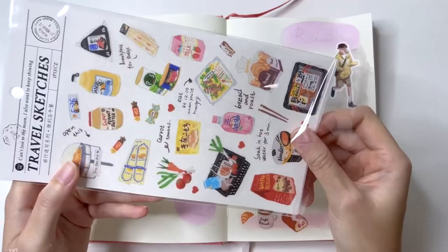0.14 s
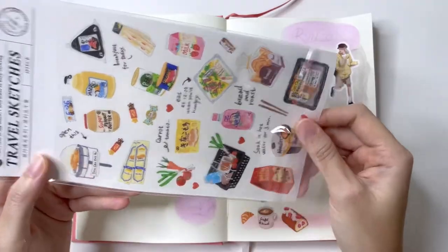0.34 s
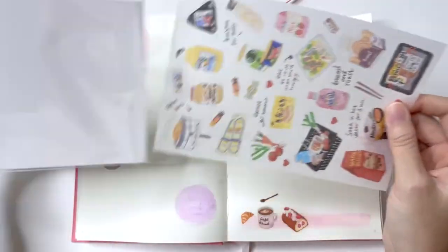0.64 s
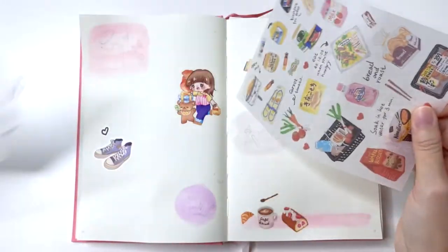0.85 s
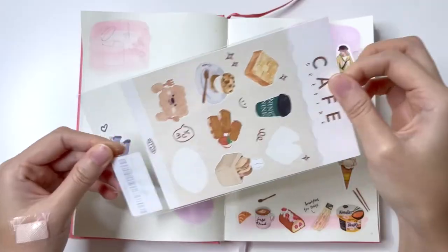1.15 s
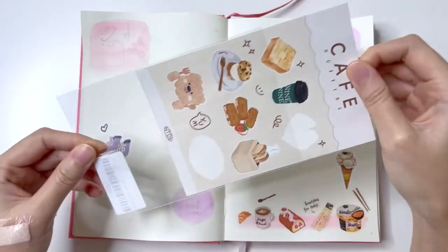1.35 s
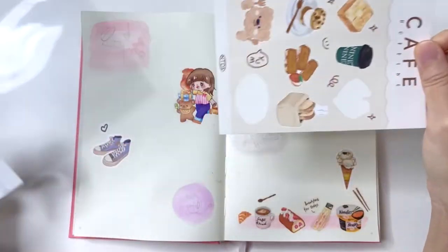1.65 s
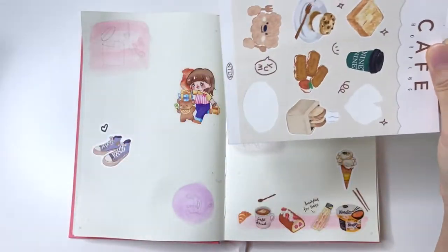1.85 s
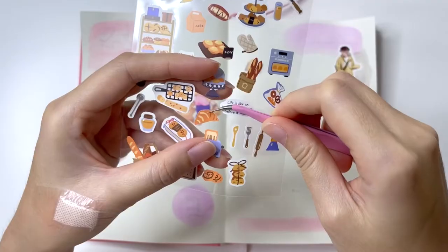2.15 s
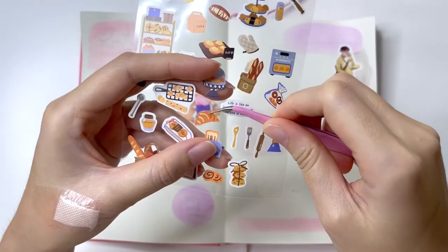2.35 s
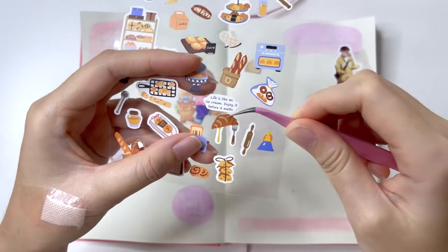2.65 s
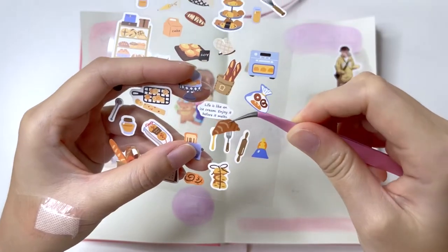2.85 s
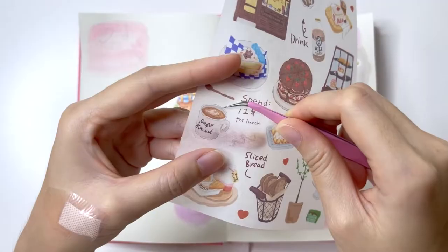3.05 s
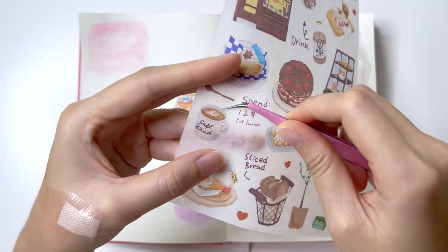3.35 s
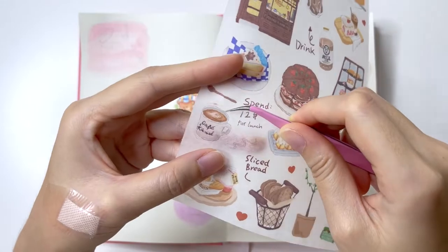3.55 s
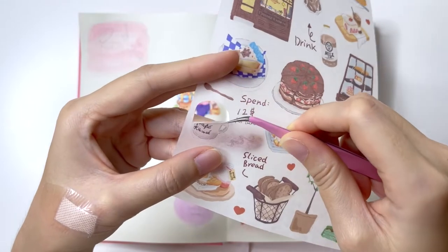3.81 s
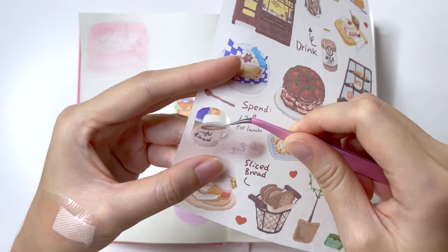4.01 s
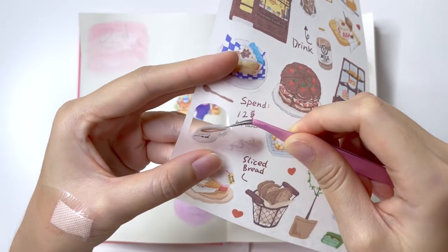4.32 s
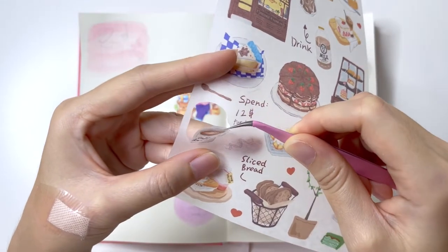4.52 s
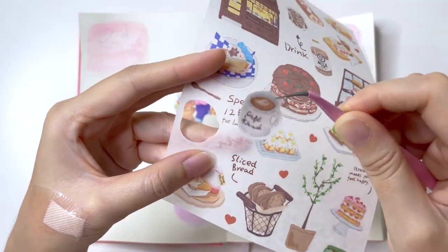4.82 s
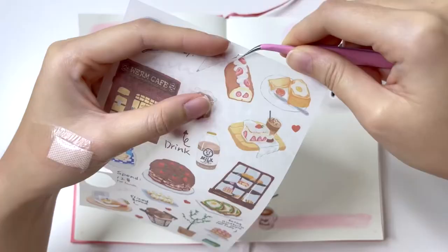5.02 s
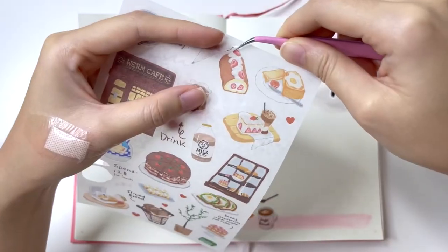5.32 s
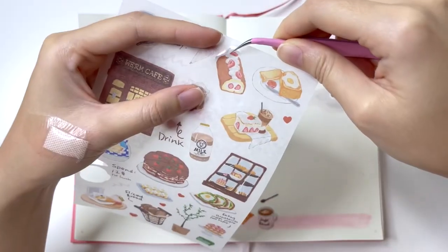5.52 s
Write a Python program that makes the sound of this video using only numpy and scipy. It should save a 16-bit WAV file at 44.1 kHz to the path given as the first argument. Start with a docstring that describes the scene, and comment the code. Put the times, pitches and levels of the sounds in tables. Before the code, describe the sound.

Bright film rustling in quick strokes stops abruptly, followed by quiet sticker peeling, small paper cracks and faint ticks above steady low hum.

```python
"""At a desk in a small room, sticker sheets are slid out of thin plastic sleeves: film hisses and crinkles.
Then tweezers lift stickers off stiff backing paper, which crackles and snaps as it buckles.
Friction is a stream of random slips; buckles are dying bursts of cracks sent through sheet resonances.
Short scrapes, ringing notes and two faint ticks join them; echoes of desk and room follow the handling.
A low mains hum and rumble lie below, a drone joins late; a close stereo pair of microphone ports hears it."""
import sys
import numpy as np
from scipy import signal
from scipy.fft import rfft, irfft, next_fast_len
from scipy.io import wavfile
from scipy.ndimage import map_coordinates

SR = 44100
rng = np.random.default_rng(int(sys.argv[2]) if len(sys.argv) > 2 else 0)


def master(y):
    """Save y as 16-bit WAV."""
    cut = np.clip(np.atleast_2d(y).T, -1, 1)
    pcm = np.round(cut * 32767)  # scale
    wavfile.write(sys.argv[1], SR, pcm.astype(np.int16))


N = 250047
TIME = np.arange(N) / SR

# pushes and drags of a sheet in its sleeve, before the layer gains:
# start_s, length_s, attack_s, release_s, swell_db, hiss_db, body_db
SLIDES = [(0.069, .2, 0.085, 0.09, 4.5, -46, -55), (0.281, 0.12, .018, 0.091, 0, -33.5, -48),
          (0.404, .218, 0.21, 0.15, -0.5, -30, -52.5), (0.766, .125, 0.2, 0.28, 4, -55.5, -58.5),
          (1.027, 0.078, 0.029, 0.088, 12, -44, -60), (1.097, 0.11, 0.076, 0.057, -18, -45, -65.5),
          (1.277, 0.204, 0.035, 0.35, 11.5, -46.5, -66), (1.489, .11, 0.21, 0.078, -0.5, -41, -56),
          (1.709, 0.096, 0.024, 0.45, -11.5, -56.5, -59.5), (1.882, 0.079, 0.032, 0.013, 1, -34, -65)]
# friction colours of the film and of the dragged sheet: frequency_hz, relative_density_db
HISS = [(1500, -34.5), (3000, -20), (4500, -18.5), (6500, -9.5), (8500, -5), (9700, -0.5), (10900, 3),
        (12000, -4), (13200, -20.5), (15800, -24)]
BODY = [(150, -14), (300, 4.5), (600, 0), (1200, 5.5), (1750, -1.5), (2250, 3), (2800, 0), (4000, 1.5),
        (6000, 0.5), (12000, -29)]
# creases of the film flipping over: start_s, level_db, brightness_db_per_octave, t60_s
CRINKLES = [(.0746, -47.5, 3.5, 0.0064), (.1207, -38, 5, 0.011), (.156, -48, 0.5, 0.0067),
            (.246, -54, 0, .007), (.3983, -48, 2, 0.0072), (.6264, -46.5, -1.5, 0.03),
            (.6469, -49, -1.5, 0.018), (.7152, -61, 1, 0.011), (.7656, -53.5, 1.3, 0.022),
            (.7861, -47, -2, 0.01), (.8114, -47.5, 3.5, .04), (.815, -45.5, 2, 0.05),
            (.9424, -59, -1, 0.019), (1.0305, -59, 4.5, .012), (1.0548, -54.5, -3, 0.0077),
            (1.0686, -48.5, -1, 0.0058), (1.0802, -49.5, -2, 0.017), (1.0989, -47, 3.5, 0.017),
            (1.6018, -57, -2.5, 0.016), (1.7084, -49.5, -1.5, 0.021), (1.7148, -46, 2, 0.014),
            (1.8806, -50, 3.5, 0.029)]
# resonances of the bent film: frequency_hz, width_hz, relative_level_db
FILM_MODES = [(588, 790, -6.5), (1278, 280, -1), (2386, 2500, -5.5), (4775, 1300, 1.5), (6270, 1020, 8),
              (8700, 2440, 15.5), (11040, 1200, 24)]
# what all film buckles share: one offset_db for each of the SNAP_BANDS
FILM_SHAPE_DB = (-1, 0, 1, 0)


def sleeves(hiss_db=-4.0, body_db=0.0, crinkle_db=.0, stray_db=-10.0):
    """Sliding friction and buckling: film hisses along the sheet, shakes it, and crinkles."""
    hiss_level = strokes([(*push, hiss) for *push, hiss, body in SLIDES])
    body_level = drag()
    hiss_rub = friction(HISS, per_s=4500, spread_db=3.3, smooth=.85, flutter_db=1.1)
    body_rub = friction(BODY, per_s=600, spread_db=3.5, smooth=.75, flutter_db=1.5)
    hiss = from_db(hiss_level + hiss_db) * hiss_rub
    body = from_db(body_level + body_db) * body_rub
    creases = [*CRINKLES, *strays(body_level + stray_db, per_s=35, spread_db=5, t60=.009)]
    crinkles = buckles(creases, FILM_MODES, FILM_SHAPE_DB, lag_s=0.00044, crackle=2.1, top_hz=12700)
    return hiss + body + from_db(crinkle_db) * crinkles


def drag():
    """Friction as a driving force: how strongly the sliding sheet is shaken, in dB."""
    return strokes([(*push, body) for *push, hiss, body in SLIDES])


# pulls of the tweezers on a sticker, before peel_db:
# start_s, length_s, attack_s, release_s, swell_db, level_db
PULLS = [(2.385, 0.013, 0.12, 0.14, -1, -62), (2.46, 0.038, 0.054, .36, -7, -55),
         (3.412, .01, .01, .25, -1.5, -61.5), (3.572, .14, 0.087, 0.32, -1, -54.5),
         (4.18, 0.082, .1, .2, -2, -71.5), (4.555, 0.06, 0.11, .33, 8, -57),
         (4.98, 0.011, 0.013, 0.088, 0, -59), (5.475, .195, .14, .1, 8, -65.5)]
# colour of the breaking glue: frequency_hz, relative_density_db
GLUE = [(200, 1), (500, 10.5), (1000, 2), (1800, 0), (2400, -3), (3200, -4), (5000, -7), (6600, -6.5),
        (8500, -0.5), (11000, 0.5), (12300, -22.5), (13500, -46.5), (16000, -29)]
# snaps and ticks of the backing paper, before snap_db:
# start_s, level_db, brightness_db_per_octave, t60_s
SNAPS = [(2.3942, -59.5, 0, .02), (2.4325, -49.5, -0.5, 0.023), (2.4368, -47, -1.7, 0.051),
         (2.4497, -33.5, 0.1, 0.015), (3.4065, -46, 0.1, 0.017), (3.5579, -58.5, 7, 0.04),
         (3.7157, -63.5, 3, 0.033), (3.7286, -55, 2.5, 0.018), (3.7492, -55.5, 1.5, 0.0047),
         (3.7843, -65.5, 0.5, .017), (4.1734, -53.5, -1, 0.015), (4.2237, -65, 3, .007),
         (4.5746, -47.5, 0.5, .08), (4.583, -32.5, 0.54, 0.023), (4.6091, -39.5, -1.5, 0.018),
         (4.9767, -52.5, -3, 0.041), (5.4368, -72, 1, 0.011), (5.4553, -71, 1, .007),
         (5.4795, -69, 0.5, .011), (5.5147, -61.5, -0.5, 0.0049)]
# resonances of the bent paper: frequency_hz, width_hz, relative_level_db
PAPER_MODES = [(335.7, 650, -0.5), (595, 920, -10.5), (833, 250, -14.5), (1480, 280, 3), (1840, 590, 3),
               (2504, 290, 2.5), (2670, 220, -2.5), (3190, 390, -2), (3820, 300, -6), (4320, 790, -6.5),
               (6330, 4200, -10.5), (8960, 1200, -5.5), (11030, 560, -1.5)]
# what all paper buckles share: one offset_db for each of the SNAP_BANDS
PAPER_SHAPE_DB = (0, 1.1, 0.23, -0.26)


def stickers(peel_db=-0.5, snap_db=-1.5, threads_per_s=3000, brisk_db=-55, stray_db=-6.5):
    """Adhesive fracture: threads of glue break in a fine crackle; the backing snaps as it bends."""
    level = strokes(PULLS)
    per_s = np.clip(threads_per_s * from_db(1.4 * (level - brisk_db)), 250, 8000)
    # the stronger the pull, the more the single breaks merge into a smooth rasp
    merged = np.clip(per_s / threads_per_s, .6, .8)
    crackle = friction(GLUE, per_s, spread_db=3.2, smooth=merged, flutter_db=1.3, spread_out=.5)
    events = [*SNAPS, *strays(level + stray_db, per_s=50, spread_db=4, t60=.01)]
    snaps = buckles(events, PAPER_MODES, PAPER_SHAPE_DB, lag_s=0.001122, crackle=0.97, top_hz=11800)
    return from_db(level + peel_db) * crackle + from_db(snap_db) * snaps


def friction(spectrum, per_s, spread_db, smooth, flutter_db, spread_out=.45):
    """Stick-slip: tiny uneven slips over a smooth rub, reaching each port a little differently."""
    sizes = from_db(spread_db * np.minimum(rng.exponential(1, N), 4)) * rng.choice([-1, 1], N)
    slips = rms_one(sizes) * (rng.random(N) < per_s / SR) * np.sqrt(SR / per_s)
    shared = slips + smooth * rng.standard_normal(N)
    own_colour = [(300, 6.0), (7000, 2.5), (9000, -11.0), (16000, -7)]
    own = spread_out * coloured(rng.standard_normal((2, N)), own_colour)
    return coloured(shared + own, spectrum) * from_db(flutter_db * drift(110))


# ranges over which the strength of a buckle is set: low_hz, high_hz
SNAP_BANDS = [(250, 1100), (1100, 3500), (3500, 7500), (7500, 14000)]
DULL_OCT_PER_DB = 0.45   # octaves the top corner moves per dB per octave of brightness


def buckles(events, modes, shape_db, lag_s, crackle, top_hz):
    """Dispersion: a kick and a dying burst of micro-cracks spread through a sheet as bending waves."""
    size, lead = 4096, 128   # samples
    hz, t = bins(size), np.arange(size) / SR
    sheet = 0
    for k, (f, width, db) in enumerate(modes):
        resonance = 1j * hz * width / (f * f - hz * hz + 1j * hz * width)
        sheet = sheet + (-1) ** k * from_db(db) * resonance
    # bending waves are slower in the bass: lag_s is about how late they come at 1 kHz
    late_s = lag_s * np.maximum(1400 / (hz + 300) - .1, 0) + lead / SR
    travel = np.exp(-2j * np.pi * np.cumsum(late_s) * hz[1])
    centres = np.sqrt(np.prod(SNAP_BANDS, axis=1))
    octaves = np.log2(centres) - np.log2(centres).mean()
    out = np.zeros(N + 2 * size)
    for (s, level_db, bright_db, t60), cracks in zip(events, rng.standard_normal((len(events), size))):
        burst = cracks * from_db(-60 * t / max(t60, .002))
        wave = (1 + crackle * rfft(burst / np.linalg.norm(burst))) * sheet * travel
        # strength in each range, as rms over 10 ms
        norms = [np.linalg.norm(wave[(hz > lo) & (hz < hi)]) for lo, hi in SNAP_BANDS]
        strength = np.array(norms) * np.sqrt(200 / size / SR)
        # a tight buckle is bright, a wide one dull
        wanted_db = level_db + np.array(shape_db) + bright_db * octaves
        gain_db = wanted_db - 20 * np.log10(strength)
        corner_hz = top_hz * 2 ** (DULL_OCT_PER_DB * min(bright_db, .5))
        filter_db = at_hz(np.c_[centres, gain_db], hz) + top_loss(hz, corner_hz)
        at = int(s * SR) - lead + size
        out[at:at + size] += irfft(wave * from_db(filter_db))
    return out[size:size + N]


def top_loss(hz, corner_hz, loss_db=19):
    """High-frequency shelf: the gain in dB falls in one smooth tanh step around the corner, to -loss_db."""
    return -loss_db * (1 + np.tanh((hz - corner_hz) / 700)) / 2


def strays(level_db, per_s, spread_db, t60):
    """Random buckling: small chance events as strong as the movement, in rows like those of CRINKLES."""
    count = int(per_s * N / SR)
    when, size, bright = rng.random((count, 3)).T
    at = (when * (N - 1)).astype(int)
    levels = level_db[at] + spread_db * (2 * size - 1)
    rows = np.c_[at / SR, levels, 3 * (2 * bright - 1), np.full(count, t60)]
    return rows[rows[:, 1] > -85]


def strokes(rows):
    """Envelope in dB of hand movements: 60 dB rise in the attack, even swell, 60 dB fall in the release."""
    level = np.full(N, -120.0)
    for start, length, attack, release, swell_db, level_db in rows:
        t = TIME - start
        before = np.maximum(-t, 0) / max(attack, .005)
        after = np.maximum(t - length, 0) / max(release, .005)
        swell = swell_db * (np.clip(t / length, 0, 1) - .5)
        level = np.maximum(level, level_db + swell - 60 * (before + after))
    return level


# a dragged edge sets one patch of the sheet ringing, levels before gain_db and the fades:
# centre_s, length_s, pitch_hz, level_db
SCRAPES = [(0.344, 0.049, 375, -50.5), (.352, 0.012, 2130, -43), (.375, 0.026, 1150, -45.5),
           (0.429, .07, 6470, -34), (.59, .06, 300, -43), (.632, 0.038, 8630, -34.5),
           (.82, .025, 5000, -41), (.881, .06, 5210, -51.5), (1.916, 0.1, 3800, -46),
           (2.495, 0.073, 2720, -56), (3.74, 0.07, 2490, -56.5), (4.645, 0.063, 2400, -58),
           (5.271, 0.21, 4700, -80), (5.63, 0.11, 3120, -66)]
# width as a share of the pitch; the pitch sinks as the free length grows
SCRAPE_WIDTH, SCRAPE_SAG_OCT_PER_S = 0.17, 2.2


def scrapes(gain_db=-3.5, snag_db=-2.0):
    """Friction-driven resonance: the pitch glides down as the free length of the sheet grows."""
    out = np.zeros(N + SR)
    for s, length, hz, level_db in [*SCRAPES, *snags(drag() + snag_db)]:
        size = min(int(length * SR), SR // 4)
        r = np.exp(-np.pi * SCRAPE_WIDTH * hz / SR)
        shake = signal.lfilter([1], [1, -r], rng.standard_normal((2, SR // 4)))[:, -size:]
        glide = 2 ** (-SCRAPE_SAG_OCT_PER_S * (TIME[:size] - length / 2))
        phase = 2 * np.pi * np.cumsum(hz * glide) / SR
        ring = rms_one(shake[0] * np.cos(phase) + shake[1] * np.sin(phase))
        at = int((s - length / 2) * SR)
        out[at:at + size] += from_db(level_db + gain_db) * ring * np.sin(np.linspace(0, np.pi, size))
    return signal.sosfilt(signal.butter(4, 12500, fs=SR, output="sos"), out[:N])


def snags(level_db, per_s=22, lowest_hz=350, highest_hz=5000, length_s=0.03, spread_db=2.0):
    """Random stick-slip: an edge catches briefly while a sheet moves, in rows like those of SCRAPES."""
    when, size, pitch = rng.random((int(per_s * N / SR), 3)).T
    at = ((.01 + .98 * when) * N).astype(int)
    pitch_hz = lowest_hz * (highest_hz / lowest_hz) ** pitch
    levels = level_db[at] + spread_db * (2 * size - 1)
    rows = np.c_[at / SR, np.full(len(at), length_s), pitch_hz, levels]
    return rows[rows[:, 3] > -70]


# a hard buckle leaves the taut patch around it ringing, levels before gain_db and decay:
# start_s, pitch_hz, level_db, t60_s
RINGS = [(0.0751, 5770, -25, 0.0055), (.121, 4830, -30, 0.0073), (1.0688, 740, -35, 0.016),
         (2.4328, 2500, -28.5, .012), (2.4496, 2630, -14.5, 0.009), (2.4531, 375, -23, 0.029),
         (3.4068, 746, -34, .009), (4.1738, 2200, -34.5, 0.0095), (4.584, 2260, -23.5, 0.017),
         (4.5826, 7910, -23.5, .012), (4.585, 245, -33.5, 0.03), (4.6104, 3800, -25.5, 0.011),
         (4.976, 1360, -35, 0.0083)]


def rings(gain_db=3.5):
    """Damped free vibration: short decaying notes of the bent sheet."""
    out, t = np.zeros(N + SR), TIME[:SR // 10]
    for s, hz, level_db, t60 in RINGS:
        at = int(s * SR)
        swell = 1 - np.exp(-hz * t)   # the note builds up over about one cycle
        decay = from_db(level_db + gain_db - 60 * t / t60)
        out[at:at + len(t)] += decay * swell * np.sin(2 * np.pi * hz * t)
    return out[:N]


# two faint dry ticks, impulse levels before dulling: start_s, level_db
TICKS = [(2.897, -24.5), (4.0316, -32)]


def ticks(dull_hz=1500):
    """Impulse response: single clicks dulled by a first-order low-pass."""
    clicks = np.zeros(N)
    for s, level_db in TICKS:
        clicks[int(s * SR)] = from_db(level_db)
    return signal.sosfilt(signal.butter(1, dull_hz, fs=SR, output="sos"), clicks + 1e-18)


def in_room(broad, notes, desk_db=-12.0, room_db=-17.5):
    """Reflection: desk and hands echo everything; the room echoes only the broad sounds.

    Small ringing patches radiate little into the room."""
    close = broad + notes
    desk_colour = [(200, -10.5), (600, 4.0), (1200, 3.0), (3000, 2.0), (6000, -0.5), (9000, -2.5), (14000, -2)]
    room_colour = [(150, 3.5), (600, 1.0), (2400, 3.5), (4500, 4.5), (7000, -0.5), (11000, -17), (15000, -14)]
    desk = reflections(close, t60=0.031, first_s=0.00036, colour=desk_colour)
    room = reflections(broad, t60=.38, first_s=0.0026, colour=room_colour)
    return close + from_db(desk_db) * desk + from_db(room_db) * room


def reflections(x, t60, first_s, colour):
    """Reverberation: a dense dying train of echoes, different at each port; unit energy."""
    t = TIME[:SR * 2 // 3]
    echoes = coloured(rng.standard_normal((2, len(t))), colour)
    echoes = echoes * from_db(-60 * t / t60) * np.clip(t / first_s - 1, 0, 1)
    echoes = echoes / np.linalg.norm(echoes, axis=1, keepdims=True)
    return signal.fftconvolve(x, echoes, axes=1)[:, :N]


# mains hum, around which the level wavers: time_s, rms_level_db
MAINS = [(0, -40.5), (.6, -39.5), (1.0, -42), (1.5, -46), (1.8, -41), (2.3, -45), (3.0, -43), (3.15, -41.5),
         (4.1, -42.5), (4.25, -45), (5.1, -40), (5.67, -39.5)]
MAINS_HZ = 48.93
# weaker steady lines: pitch_hz, rms_level_db, waver_db
HUM = [(99.6, -64.5, 4.5), (129.6, -58.5, 5), (249.5, -63.5, 3.5)]
# one line of the hum throbs slowly
THROB_HZ, THROB_DB, THROB_DEPTH_DB = 199.2, -56.5, 4
THROBS_PER_S, FIRST_THROB_S = 2.48, .06
# colour of the room rumble: frequency_hz, relative_density_db
ROOM_TONE = [(20, -26.5), (35, -8), (55, 4), (80, 2.5), (105, -4), (135, -1), (170, -1.5), (230, -10),
             (320, -13.5), (500, -18), (800, -23.5), (1300, -32.5), (2500, -44), (5000, -51.5),
             (12000, -52), (13500, -83)]


def background(tone_db=-51.0, apart_db=-52):
    """Line spectrum over broadband noise: wavering mains hum above the rumble of the room."""
    throb = np.cos(2 * np.pi * THROBS_PER_S * (TIME - FIRST_THROB_S))
    mains_db, = in_time(MAINS)
    hum = tone(MAINS_HZ, mains_db + 1.5 * drift(9.5), .7)
    hum = hum + tone(THROB_HZ, THROB_DB + THROB_DEPTH_DB * throb + 1.3 * drift(4.6), .8)
    for hz, level_db, waver_db in HUM:
        hum = hum + tone(hz, level_db + waver_db * np.tanh(drift(6)), .6)
    rumble = from_db(tone_db) * coloured(rng.standard_normal(N), ROOM_TONE)
    # long waves reach both ports alike, short ones differ
    apart = from_db(apart_db) * coloured(rng.standard_normal(N), ROOM_TONE)
    apart = signal.sosfilt(signal.butter(1, 330, "high", fs=SR, output="sos"), apart)
    return hum + drone() + rumble + apart * [[1], [-1]]


# a low drone that sets in late, level of each tone before gain_db: time_s, rms_level_db
DRONE = [(4.9, -77.5), (5.08, -47), (5.67, -49.5)]
# its two tones: pitch_hz
DRONE_HZ = (123.8, 129.4)


def drone(gain_db=-1.5):
    """Beating: two close low tones drift in and out of step."""
    level, = in_time(DRONE)
    return sum(tone(hz, level + gain_db, 1.6) for hz in DRONE_HZ)


def tone(hz, level_db, waver_hz):
    """Frequency modulation: a sine of the given rms level whose pitch wavers."""
    phase = 2 * np.pi * np.cumsum(hz + waver_hz * drift(4)) / SR
    return np.sqrt(2) * from_db(level_db) * np.sin(phase)


def from_db(db):
    """Decibels: level to amplitude ratio."""
    return 10 ** (np.asarray(db) / 20)


def rms_one(x):
    """Normalisation to unit rms."""
    return x / np.sqrt(np.mean(x ** 2) + 1e-20)


def in_time(rows):
    """Linear interpolation: each column of a curve, sample by sample."""
    s, *columns = np.transpose(rows)
    return [np.interp(TIME, s, c) for c in columns]


def at_hz(points, hz):
    """Logarithmic pitch axis: read a spectrum between its points."""
    f, value = np.transpose(points)
    return np.interp(np.log(hz + 1), np.log(f), value)


def bins(size):
    """Fourier analysis: the frequencies of the bins in Hz."""
    return np.fft.rfftfreq(size, 1 / SR)


def coloured(x, spectrum):
    """Linear filtering: give a signal a spectrum; rms 1."""
    size = next_fast_len(x.shape[-1])
    gain = from_db(at_hz(spectrum, bins(size)))
    return rms_one(irfft(rfft(x, size) * gain, size)[..., :x.shape[-1]])


def drift(rate):
    """Slow random modulation: chance of spread about 1, with rate random knots a second."""
    knots = rng.standard_normal(N // 10)
    return map_coordinates(knots, [TIME * rate + 2], order=1, mode="wrap") * np.sqrt(3 / 2)


RUSTLE_STOP_S = 1.969   # the rustle stops dead here, echo and all


def scene():
    """Superposition: handling sounds in the room, over its hum."""
    handling = in_room(sleeves() + stickers() + scrapes(), rings())
    pause = np.interp(TIME - RUSTLE_STOP_S, [0, .004, .2, .3], [1, 0, 0, 1])
    return handling * pause + ticks() + background()


# level of the left port over the right: frequency_hz, left_minus_right_db
PORT_BALANCE = [(60, .5), (200, 0), (700, -1.5), (2400, -2.5), (4400, -3), (8100, -0.85), (15000, 0.5)]
# angle by which the left port leads the right: frequency_hz, lead_rad
PORT_PHASE = [(20, 0), (1000, -.1), (2600, -.6), (5000, -.45), (7600, -1.15), (8700, 0), (9500, 1.4),
              (10250, 3.1), (11000, 4.7), (11800, 5.8), (12700, 6.5), (14400, 12.6)]
CUTOFF_HZ = 16000


def record(dry):
    """Interchannel difference: the two ports differ in level and phase; the top is cut."""
    size = next_fast_len(N + SR // 10)
    hz = bins(size)
    balance = from_db(at_hz(PORT_BALANCE, hz) * [[.5], [-.5]])
    lag = np.exp(-1j * at_hz(PORT_PHASE, hz) * [[0], [1]])
    heard = irfft(rfft(dry, size) * (balance * lag), size)[:, :N]
    return signal.sosfilt(signal.ellip(10, .1, 80, CUTOFF_HZ, fs=SR, output="sos"), heard)


dry = scene()
out = record(dry)
master(out)
```